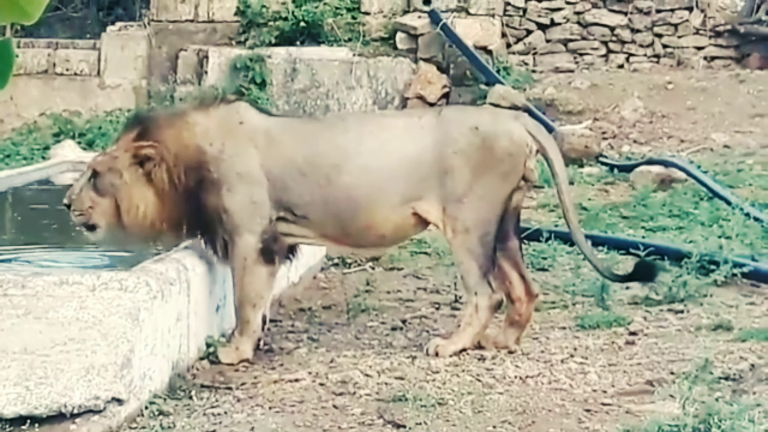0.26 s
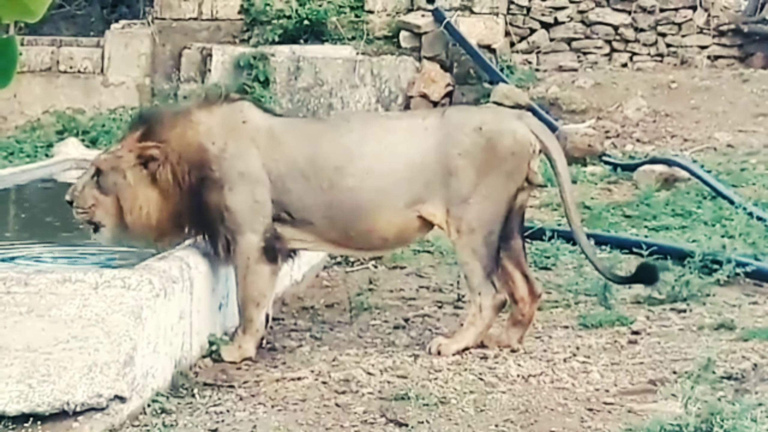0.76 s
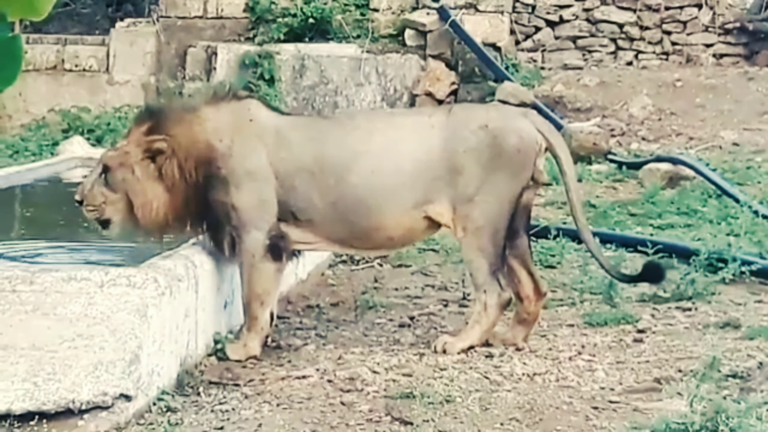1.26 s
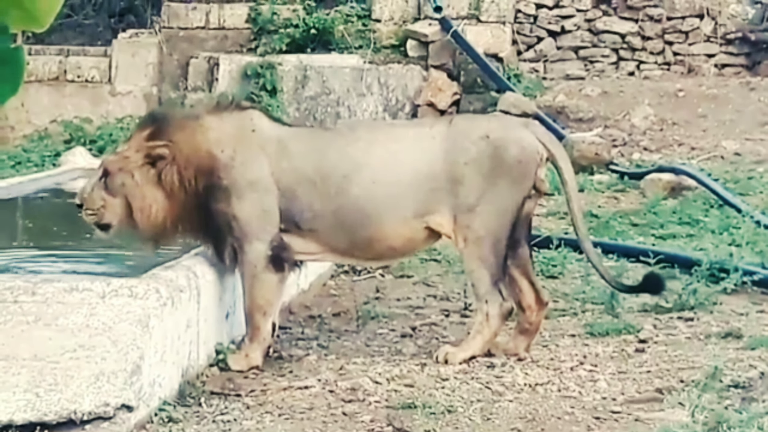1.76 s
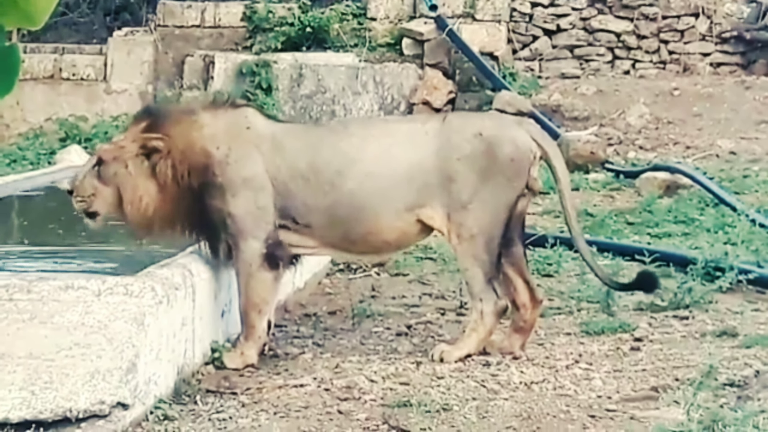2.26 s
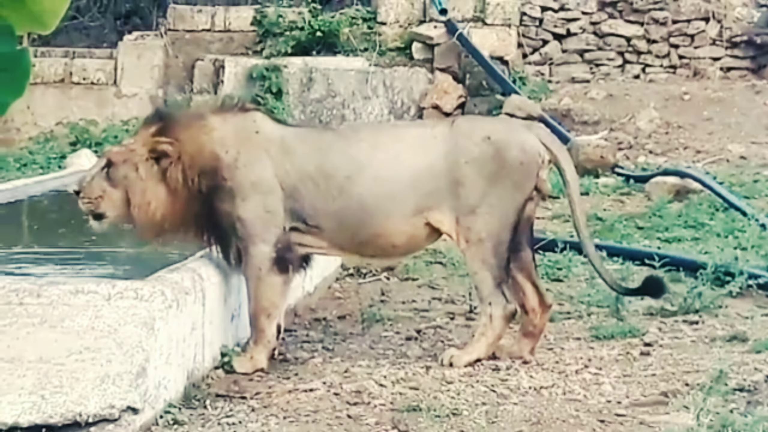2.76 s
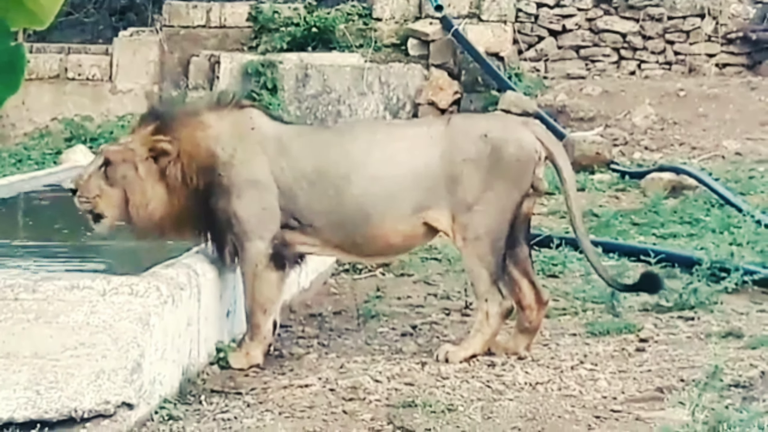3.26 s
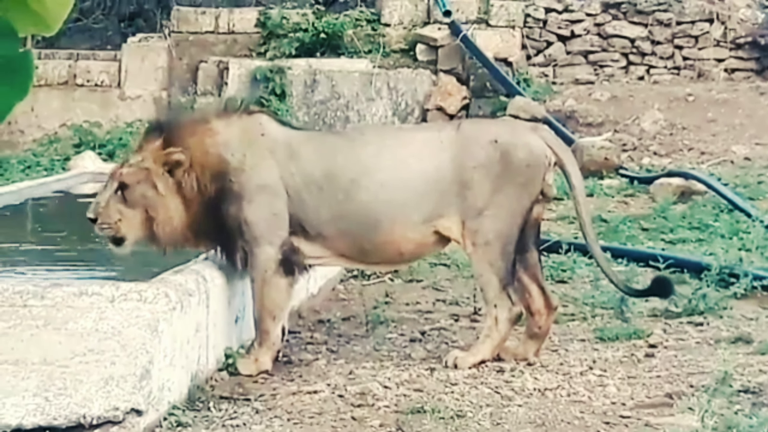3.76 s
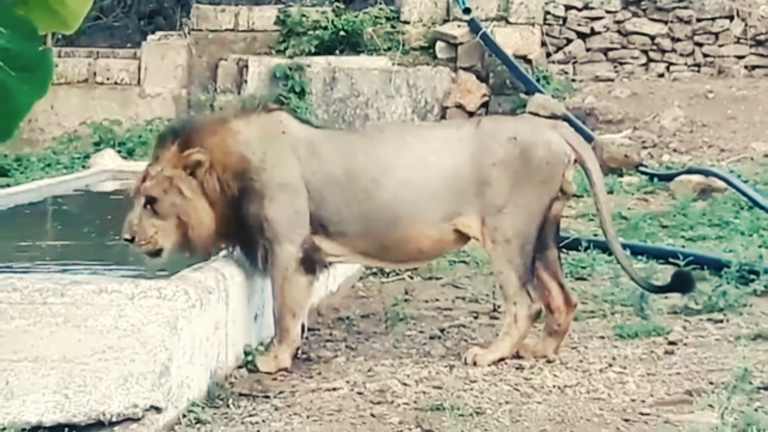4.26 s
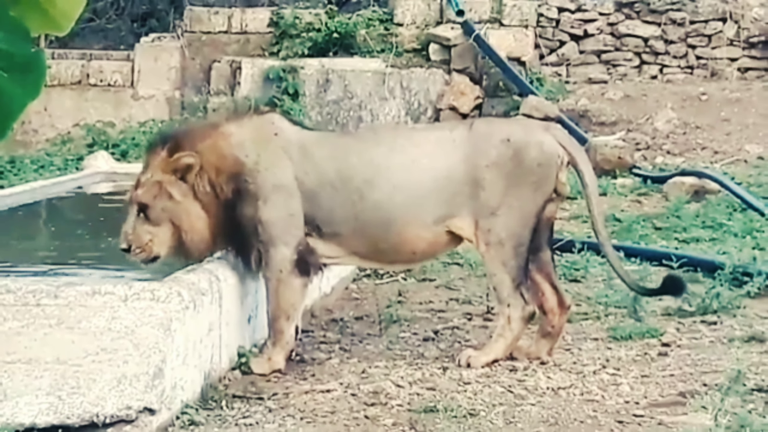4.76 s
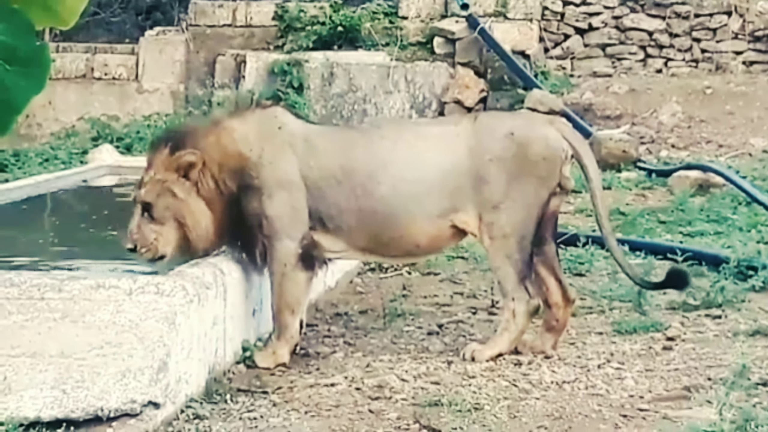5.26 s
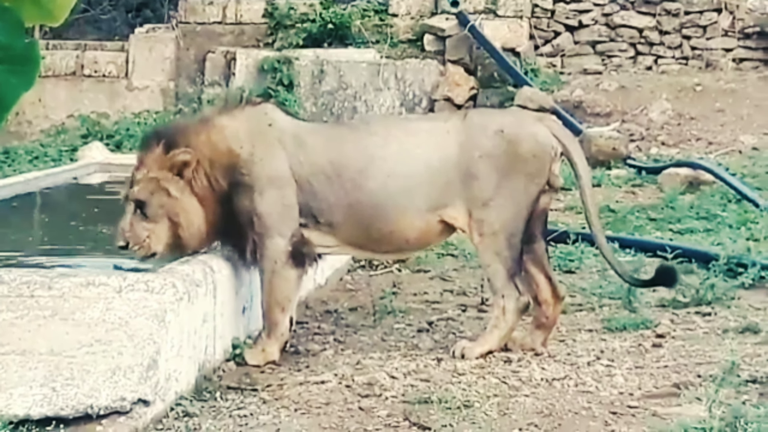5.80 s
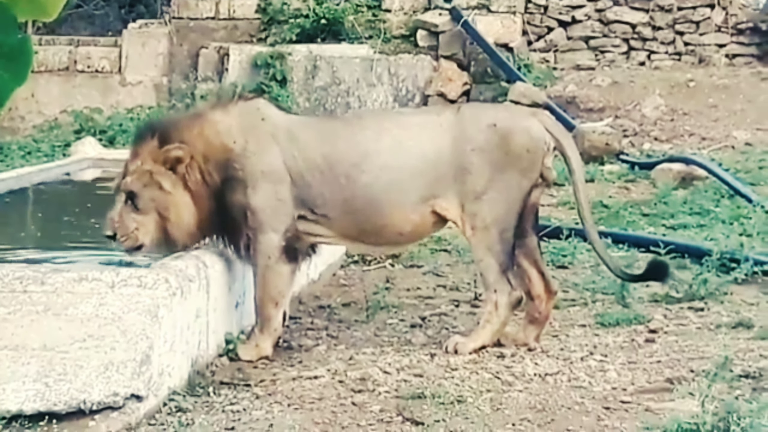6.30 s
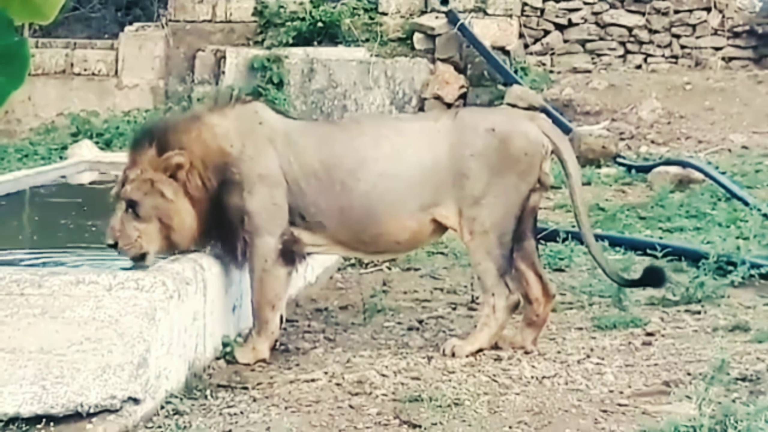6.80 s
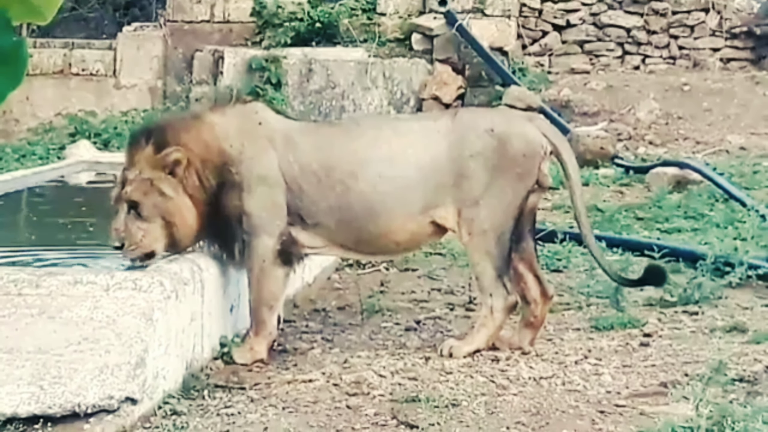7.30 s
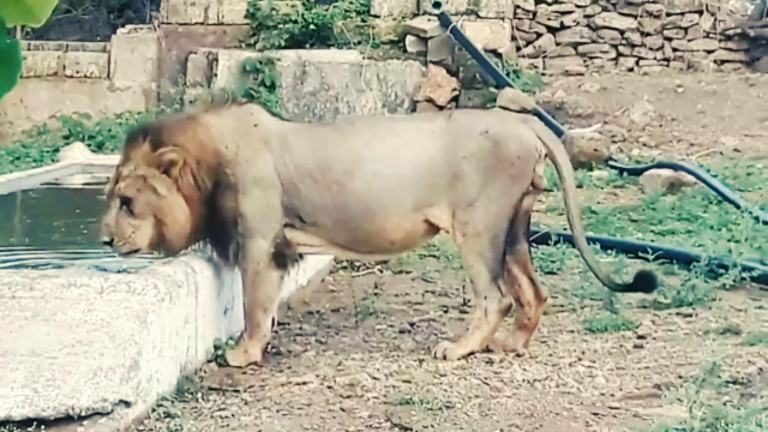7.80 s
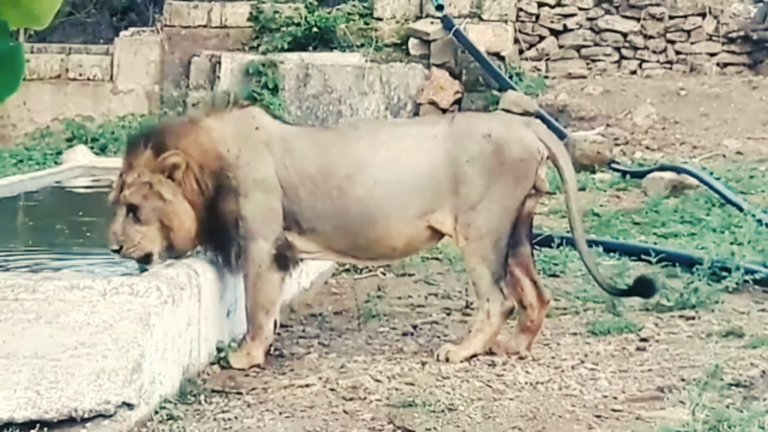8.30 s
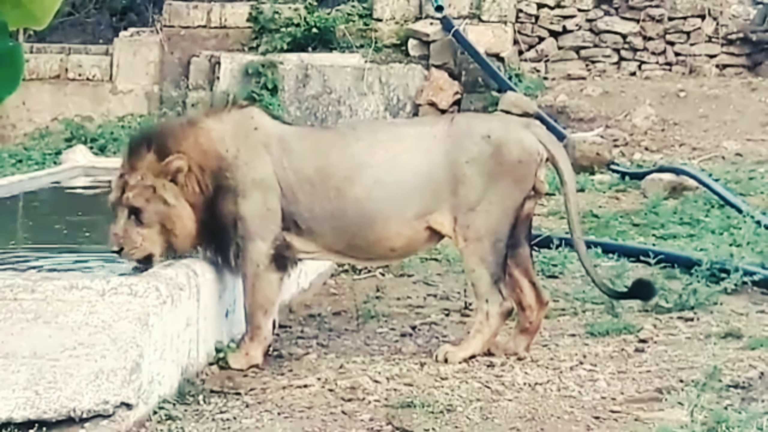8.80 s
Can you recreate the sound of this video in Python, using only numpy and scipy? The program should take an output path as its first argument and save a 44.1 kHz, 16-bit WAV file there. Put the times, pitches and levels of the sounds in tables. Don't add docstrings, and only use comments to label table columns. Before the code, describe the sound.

Loud, low lion grunts in steady rhythm dominate a walled yard, each a boomy pulse turning raspy and airy. They grow softer, lower and further apart near the end, with wheezy intakes of air between some. A songbird repeats a quick four-note figure in bouts over scattered whistles and a faint distant bird chorus. Late on come a tiny water drip and a soft footfall. Outdoor pickup from several metres, light hiss, short stony echo.

```python
import sys
import numpy as np
from scipy import signal
from scipy.fft import rfft, irfft
from scipy.io import wavfile
from scipy.ndimage import uniform_filter1d, minimum_filter1d

SR = 44100
rng = np.random.default_rng(int(sys.argv[2]) if len(sys.argv) > 2 else 0)


def gain_from_db(level_db):
    decades = np.asarray(level_db, float) / 20
    return 10 ** decades


def int16_out(signal):
    q = np.round(np.clip(np.atleast_2d(signal).T, -1, 1) * 32767)
    wavfile.write(sys.argv[1], SR, q.astype(np.int16))


N = 399105
TIME = np.arange(N) / SR


def set_rms(x, db=0):
    return x * gain_from_db(db) / np.sqrt(np.mean(x ** 2))


def noise():
    return rng.standard_normal(N)


def resonance(x, hz, width):
    return signal.lfilter(*signal.iirpeak(hz, hz / width, fs=SR), x)


def highpass(order, hz):
    return signal.butter(order, hz, "high", fs=SR, output="sos")


def colour(x, points):
    hz, db = np.transpose(points)
    bins = np.arange(N // 2 + 1) * SR / N + 1
    curve_db = np.interp(np.log(bins), np.log(hz), db, -120, -120)
    return irfft(rfft(x) * gain_from_db(curve_db), N)


def wander(rate):
    hold = int(SR / rate)
    steps = np.repeat(rng.standard_normal(N // 20)[:N // hold + 1], hold)
    smooth = uniform_filter1d(uniform_filter1d(steps, hold), hold)
    return set_rms(smooth[:N])


def resonances(x, modes):
    total = np.zeros(N)
    for k, (hz, width, db) in enumerate(modes):
        flicker_db = 2.2 * wander(22)
        total += (-1) ** k * gain_from_db(db + flicker_db) * resonance(x, hz, width)
    return set_rms(total)


def loudness_curve(tables, rise_s=0.0065, fade_s=0.11):
    points = []
    for table in tables:
        points.append((table[0][0] - rise_s, -80))
        points.extend(table)
        points.append((table[-1][0] + fade_s, -80))
    return gain_from_db(np.interp(TIME, *np.transpose(points)))


def add_whistle(out, start, length, hz0, hz2, db, halfway=0.49):
    u = np.linspace(0, 1, int(length * SR))
    hz1 = hz0 + halfway * (hz2 - hz0)
    hz = np.polyval(np.polyfit([0, .5, 1], [hz0, hz1, hz2], 2), u)
    hz = hz * (1 + 0.0868 * uniform_filter1d(rng.standard_normal(len(u)), size=200))
    swell = np.sin(np.pi * u) ** 0.297
    note = np.sin(2 * np.pi * np.cumsum(hz) / SR) * swell * gain_from_db(db) * np.sqrt(2)
    i = int(start * SR)
    out[i:i + len(u)] += note[:N - i]


def still_air():
    # frequency in Hz, dB per Hz.
    air_colour = [(18, -25), (30, -10.5), (53, -8), (152, -8), (2420, -15), (5020, -5), (6870, -14),
                  (7830, -38.5), (13500, -29), (15400, -66.5)]
    gusts = gain_from_db(1.5 * wander(4.005))
    return set_rms(colour(gusts * noise(), air_colour), -52.5)


def earlier_grunt():
    hum = resonance(resonance(noise(), 145, 70), 145, 70)
    decay_s = .4
    return gain_from_db(-44) * np.exp(-TIME / decay_s) * set_rms(hum)


def chorus():
    # time in seconds, level in dB of the lower voices.
    low_levels = [(0.1, -51.5), (0.65, -57.5), (1.25, -55), (1.9, -49.5), (2.2, -47), (3.2, -48.5),
                  (3.75, -49), (4.35, -54), (5.0, -50.5), (5.55, -56), (6.2, -53), (6.8, -52), (7.5, -50),
                  (7.8, -46), (8.3, -53), (8.65, -56), (9.04, -55)]
    # time in seconds, level in dB of a bout of the high voices.
    high_bouts = [(.4, -51), (1.4, -57.5), (1.9, -63.5), (2.72, -53), (3.75, -52), (5.05, -57.5),
                  (5.75, -57.5), (6.2, -59), (6.75, -59.5), (7.6, -67), (8.3, -51), (9, -60.5)]
    # frequency in Hz, dB per Hz.
    chorus_colour = [(1470, -56.5), (2500, -14), (2940, 4), (3650, 0.5), (4190, -2.5), (4710, 0.5),
                     (6060, 2.5), (7120, -7.5), (8000, -43), (10400, -81), (17600, -120)]
    rest_db, bout_s = -73, 0.2
    bouts = gain_from_db(rest_db)
    for at, db in high_bouts:
        bouts = bouts + gain_from_db(db) * np.exp(-((TIME - at) / bout_s) ** 2)
    chirps = np.zeros(N)
    for when, pitch, fall, size in rng.random((700, 4)):
        hz = 2900 + 4200 * pitch
        length = 0.016 + 0.075 * size ** 2
        add_whistle(chirps, when * N / SR, length, hz * (1 + .04 * fall ** 2), hz * (1 - 0.034 * fall), -9 * size)
    blur = np.zeros(N)
    for hz in np.arange(2600, 8000, 300):
        patches = gain_from_db(5.5 * wander(6.1))
        blur += patches * resonance(noise(), hz, 260)
    flock = colour(set_rms(blur) + set_rms(chirps, -5), chorus_colour)
    high = signal.sosfiltfilt(highpass(4, 5700), flock)
    times, low_db = np.transpose(low_levels)
    return set_rms(flock - high) * gain_from_db(np.interp(TIME, times, low_db)) + set_rms(high) * bouts


def footfall():
    # time in seconds, pitch in Hz, decay in seconds, level in dB.
    thump = (8.651, 150, .005, -41)
    start, hz, decay, db = thump
    after = np.clip(TIME - start, 0, None)
    swell = np.e * after / decay * np.exp(-after / decay)
    return gain_from_db(db) * np.sin(2 * np.pi * hz * after) * swell


def trough_drop():
    # start in seconds, length in seconds, start pitch in Hz, end pitch in Hz, level in dB.
    bubble = (7.775, .035, 430, 1100, -50)
    out = np.zeros(N)
    add_whistle(out, *bubble, halfway=0.35)
    return out


def other_birds():
    # start in seconds, length in seconds, start pitch in Hz, end pitch in Hz, level in dB.
    whistles = [(0.008, 0.073, 2507, 2380, -54), (.1, 0.17, 2410, 2060, -58.5),
                (.65, 0.18, 2980, 2872, -58.5), (0.758, 0.19, 5710, 5610, -49),
                (1.1, 0.077, 3030, 2590, -50.5), (.76, .13, 4000, 4000, -57.5),
                (1.207, 0.345, 2522, 2112, -52.5), (2.549, 0.31, 2499, 2150, -56.5),
                (2.634, 0.11, 6780, 6603, -43), (4.819, 0.122, 2901, 2570, -48),
                (5.12, 0.074, 2524, 2437, -57), (5.399, 0.14, 2935, 2473, -53.5),
                (5.485, 0.13, 1519, 1379, -56), (5.71, .1, 2283, 1990, -60.5),
                (6.713, 0.097, 6717, 6706, -53), (6.8, 0.087, 6643, 6446, -45.5),
                (6.823, 0.098, 2305, 2000, -54.5), (7.343, 0.13, 3421, 3140, -50),
                (7.347, 0.16, 4810, 4626, -53.5), (7.516, 0.14, 6437, 6290, -41.5),
                (7.661, 0.12, 3050, 2981, -48.5), (7.812, 0.04215, 2250, 2118, -54.5),
                (8.15, 0.1, 2296, 2063, -56.5), (8.334, 0.13, 1915, 1760, -64.5)]
    risers = [(3.752, 0.17, 1800, 1949, -55.5), (3.858, 0.054, 2925, 2920, -53.5),
              (4.3, 0.092, 2500, 2800, -53.5), (4.32, .17, 3030, 3098, -56), (2.02, 0.046, 3800, 3850, -47),
              (2.08, 0.062, 3211, 3229, -53), (3.1, 0.07, 3360, 3320, -56.5), (4.8, .12, 6548, 6642, -54),
              (5.04, 0.0715, 6250, 6200, -50), (5.685, 0.03, 5905, 7320, -52),
              (6.878, 0.06, 3255, 3370, -49), (7.07, 0.05, 6583, 6826, -45),
              (7.505, 0.1, 3826, 3910, -43.5), (8.951, 0.13, 1700, 1893, -65),
              (9.022, 0.027, 2290, 3540, -52)]
    # start in seconds, start pitch in Hz, end pitch in Hz, level in dB.
    chips = [(1.28, 3400, 3320, -39), (1.441, 3329, 3370, -37), (7.8, 3050, 3252, -54),
             (8.16, 3300, 3025, -50.5), (2.03, 3500, 3200, -52), (2.6, 3501, 2890, -58),
             (3.029, 4030, 3935, -45), (5.09, 4110, 3700, -47.5), (5.45, 3827, 3550, -45),
             (5.531, 4780, 4620, -47), (6.785, 7430, 6270, -41), (6.985, 3630, 3460, -43),
             (7.051, 3490, 3404, -40), (7.29, 3750, 3370, -41), (7.83, 3657, 3545, -45.5)]
    slurs = [(5.597, 4720, 3600, -48), (6.071, 4693, 3460, -46.5), (6.298, 4906, 3410, -46),
             (8.405, 6940, 4393, -47)]
    strokes = [(1.275, 3870, 3290, -47), (1.29, 7510, 6800, -50), (1.305, 7400, 6700, -53),
               (1.32, 7070, 6500, -54), (2.414, 7350, 6600, -40.5), (6.74, 6904, 6480, -51),
               (7.638, 4650, 3746, -39.5), (7.71, 4540, 3720, -38.5)]
    hooks = [(3.259, 3911, 2952, -50), (3.84, 3599, 2908, -54), (4.275, 4155, 3047, -49),
             (5.744, 7446, 5525, -47.5), (6.125, 7595, 6196, -55)]
    out = np.zeros(N)
    for notes, halfway in ((whistles, 0.35), (risers, .75)):
        for note in notes:
            add_whistle(out, *note, halfway)
    # its notes, length in seconds, share of the glide done halfway
    kinds = ((chips, .035, 0.57), (slurs, .075, .6), (strokes, 0.028, 0.57), (hooks, .055, .8))
    for notes, length, halfway in kinds:
        for start, *note in notes:
            add_whistle(out, start, length, *note, halfway)
    return out


def songbird():
    # start in seconds from the main slur, length in seconds, start pitch in Hz,
    # end pitch in Hz, level in dB.
    figure = [
        (-.097, .02, 3514, 3640, -6),
        (-.062, 0.027, 4285, 4050, -2),
        (-.025, 0.024, 5010, 5143, -0.5),
        (0, 0.04, 4449, 3980, 2.5),
    ]
    bends = (.4, 0.11, .9, 0.672)
    # time of the main slur in seconds, level in dB.
    repeats = [(0.954, -45), (1.231, -42), (1.509, -43), (1.791, -44), (3.336, -41), (3.613, -41),
               (3.887, -41), (4.167, -40.5), (4.453, -41.5), (4.744, -44), (5.022, -41), (5.305, -39.5),
               (7.725, -44.5), (8.006, -41.5), (8.285, -40.5), (8.563, -42), (8.848, -43.5)]
    out = np.zeros(N)
    for start, db in repeats:
        tune = 1 + 0.0061 * rng.standard_normal()
        for (lag, length, hz0, hz2, note_db), bend in zip(figure, bends):
            add_whistle(out, start + lag, length, tune * hz0, tune * hz2, db + note_db, bend)
    return out


def yard(x):
    # frequency in Hz, width in Hz, seconds to fade by 60 dB, level in dB.
    echo_bands = [(146.3, 150, 1.4, -51.5), (400, 180, 1.1, -44), (169.6, 225, 0.12, -24),
                  (420, 400, 0.96, -39), (1300, 3300, 0.57, -20.5), (5100, 13000, 0.92, -17.5)]
    t = TIME[:2 * SR]
    echo = np.zeros(len(t))
    for hz, width, fade_s, db in echo_bands:
        tail = resonance(resonance(rng.standard_normal(len(t)), hz, width), hz, width)
        tail = tail * np.exp(-np.log(1000) * t / fade_s) * np.clip(t / 0.012, 0, 1)
        echo += gain_from_db(db) * tail / np.sqrt(np.sum(tail ** 2))
    return signal.fftconvolve(x, echo)[:N]


def wheeze():
    # start in seconds, length in seconds, top level in dB.
    breaths = [
        (1.12, 0.2, -75),
        (2.402, .42, -42.5),
        (6.595, 0.33, -48),
        (7.277, .51, -46),
    ]
    # resonance in Hz, width in Hz, level in dB.
    nose = [(1080, 120, -6.5), (1470, 92, 0.5), (1647, 60.9, 5.5)]
    curves = []
    for start, length, db in breaths:
        curves.append([(start, -49.5), (start + .43 * length, db), (start + length, db - 19)])
    flutter = gain_from_db(2.0 * wander(35))
    return loudness_curve(curves, rise_s=.05) * flutter * resonances(noise(), nose)


def grunt(start, length, hz, swell_db, broken_db):
    top, catch, end = start + .05, start + .077, start + length
    blow, slack, sink = (catch + share * (end - catch) for share in (0.21, .5, 0.66))
    strength_db = broken_db + 9.5
    rasp_db, huff_db = 0.38 * strength_db, 0.35 * strength_db
    pitch = [(start, .91 * hz), (top, hz), (catch, 1.05 * hz), (slack, .88 * hz), (end, .85 * hz)]
    hold_s = 0.0172
    tone = [(start, swell_db - 30), (top - hold_s / 2, swell_db - 2), (top + hold_s, swell_db),
            (catch, broken_db - 2), (blow, broken_db), (sink, broken_db - 10.5), (end, -35.5)]
    rasp = [(start, -49), (start + .022, -31), (blow, rasp_db - 20.5), (sink, rasp_db - 31), (end, -46)]
    huff = [(start, -48), (top, -40.5 - 0.41 * strength_db), (blow, huff_db - 28.5),
            (slack, huff_db - 31.5), (end, -47)]
    return pitch, tone, rasp, huff


def chest_tone(cycles, flaps, rough):
    # distance from the main tone in steps of the growl rate, level in dB.
    side_tones = [(-2, -30), (-1, -14), (1, -8), (2, -16), (3, -20)]
    sides = np.zeros(N)
    for step, db in side_tones:
        sides += gain_from_db(db + 1.59 * wander(30)) * np.sin(2 * np.pi * (cycles + step * flaps))
    main = np.sin(2 * np.pi * cycles) * gain_from_db(3.2 * rough * wander(45) - 1.5)
    return np.sqrt(2) * (main + rough * sides)


def throat_rasp(cycles, force, puff, opening):
    # resonance in Hz, width in Hz, level in dB.
    throat = [(252, 51, 1.5), (321.3, 75, 2.5), (371, 47, 4.5), (451, 57, -0.5), (502.6, 43, -2),
              (640.5, 53, -4), (806, 32, -7), (914.4, 35, -7.5), (1190, 78, -7.5), (1441, 66, -10.5),
              (1626.7, 76, -12.5)]
    slaps = set_rms(np.diff(np.floor(cycles), prepend=0) * force)
    rasp = resonances(.9 * slaps + set_rms(puff * noise()), throat)
    closed = signal.sosfilt(signal.butter(1, 500, fs=SR, output="sos"), rasp)
    return closed + np.sqrt(opening) * (rasp - closed)


def mouth_huff(puff, opening, gain):
    # frequency in Hz, dB per Hz.
    huff_colour = [(1060, -33.5), (1800, -20), (1990, -3), (2720, -7), (3600, -4.5), (6280, -4),
                   (8080, -7.5), (9250, -12.5), (15400, -32)]
    # resonance in Hz, width in Hz.
    mouth = [(2000, 17), (2360, 210), (3500, 780), (3850, 120), (4870, 110), (6240, 140)]
    rush = set_rms(colour((0.65 + puff) * gain_from_db(1.2 * wander(40)) * noise(), huff_colour))
    flares = np.zeros(N)
    for hz, width in mouth:
        flares += gain_from_db(4 * wander(30)) * resonance(rush, hz, width)
    huff = opening * gain * set_rms(rush + 1.58 * flares)
    bright = signal.sosfiltfilt(highpass(2, 9500), huff)
    brightness = np.clip(gain / gain_from_db(-32.5), 0, 1) ** 2
    return huff - bright * (1 - brightness)


def cat():
    # start in seconds, length in seconds, chest tone in Hz, clean swell in dB, broken tone in dB.
    grunts = [(0.262, 0.25, 153.6, -1.5, -6), (0.896, 0.26, 151.7, -0.5, -6), (1.529, .26, 151.4, -2, -5.5),
              (2.172, 0.25, 150.4, -1, -7), (2.802, 0.25, 152.4, -0.5, -7.5), (3.399, 0.23, 149, 0.5, -6.5),
              (3.971, 0.23, 148.9, -1.5, -11.5), (4.566, 0.23, 145.8, -1.5, -11.5),
              (5.166, .222, 143.2, -4, -11), (5.782, .213, 141.7, -3, -12), (6.413, 0.22, 141.5, -2.5, -13),
              (7.084, .227, 135.2, -3.5, -18), (7.903, .2, 126.1, -6.5, -22.5)]
    pitch, tone_db, rasp_db, huff_db = zip(*(grunt(*row) for row in grunts))
    starts = np.array([row[0] - .01 for row in grunts])
    since = TIME - starts[np.clip(np.searchsorted(starts, TIME) - 1, 0, None)]
    break_s, break_over_s, settle_s = .07, .025, .13
    rough = np.clip((since - break_s) / break_over_s, 0, 1)
    rough = rough * np.interp(since, [settle_s, 2 * settle_s], [1, .35])
    opening = np.clip(since / break_s, 0, 1)
    times, hz = np.vstack(pitch).T
    cycles = np.cumsum(np.interp(TIME, times, hz) * (1 + .07 * rough * wander(90))) / SR
    growl_hz = 42
    flaps = np.cumsum(growl_hz * (1 + .3 * wander(25))) / SR
    force = gain_from_db(1.8 * rng.standard_normal(N // 100))[cycles.astype(int)]
    force = force * (1 - .45 * rough * (flaps % 1))
    puff = np.exp(-(cycles % 1) / 1.5) * force
    tone = loudness_curve(tone_db) * chest_tone(cycles, flaps, rough)
    rasp = loudness_curve(rasp_db) * throat_rasp(cycles, force, puff, opening)
    huff = mouth_huff(puff, opening, loudness_curve(huff_db))
    return signal.sosfilt(highpass(3, 70), tone + rasp) + huff


def scene():
    near = cat() + wheeze()
    around = songbird() + other_birds() + trough_drop() + footfall()
    echoes = yard(near + gain_from_db(5.5) * around)
    mix = near + around + echoes + earlier_grunt() + chorus() + still_air()
    return mix[None, :]


def low_pass(x):
    return signal.sosfilt(signal.butter(12, 15590, fs=SR, output="sos"), x)


def record(dry):
    heard = dry - .95 * resonance(dry, 8043, 900)
    room_left = minimum_filter1d(np.minimum(1, 1 / (np.abs(heard) + 1e-9)), size=400)
    heard = heard * uniform_filter1d(room_left, size=500) - .0012
    return low_pass(np.clip(heard, -1, 1))


dry = scene()
out = record(dry)
int16_out(out)
```